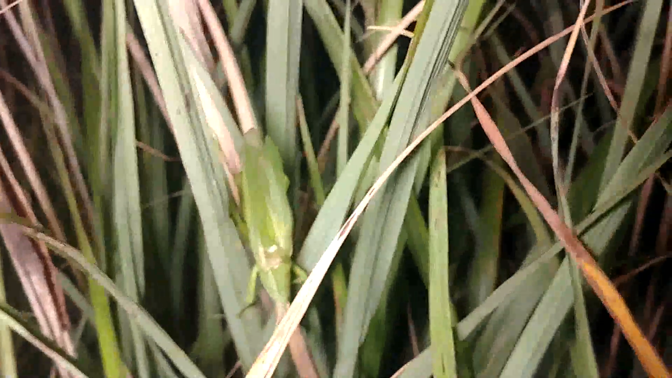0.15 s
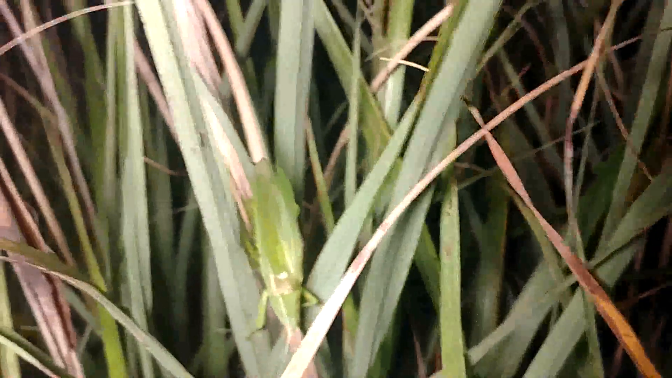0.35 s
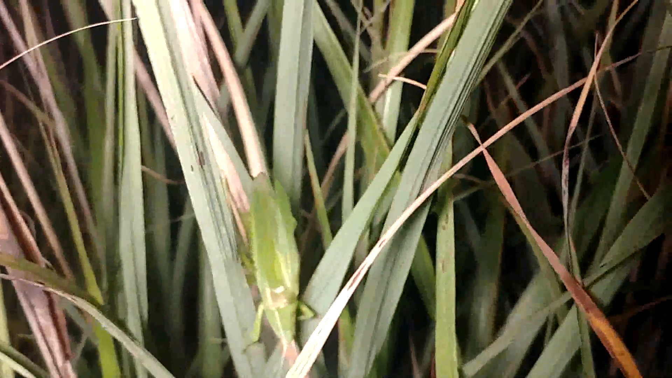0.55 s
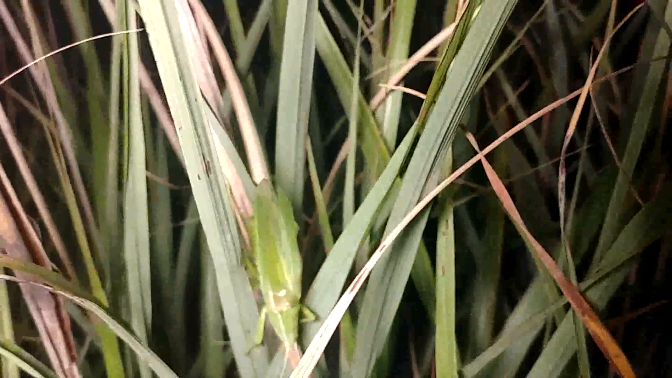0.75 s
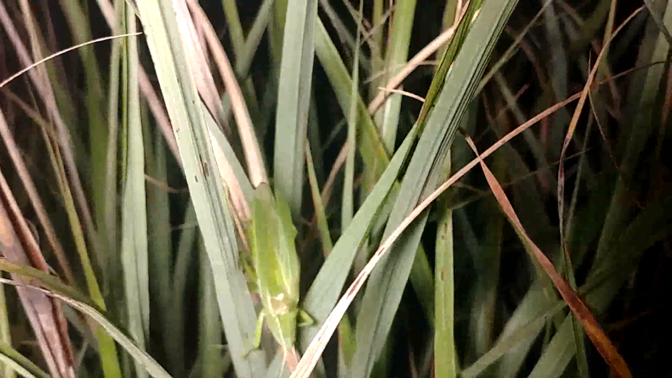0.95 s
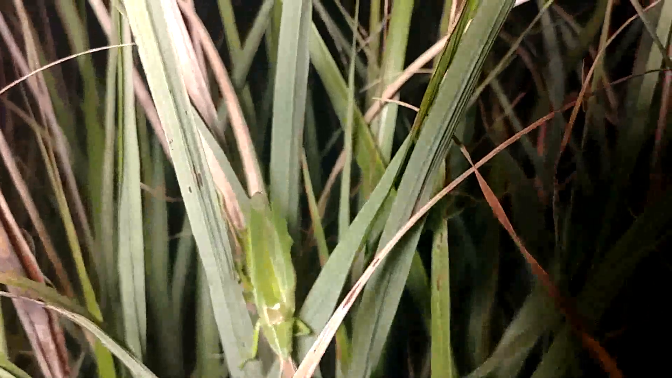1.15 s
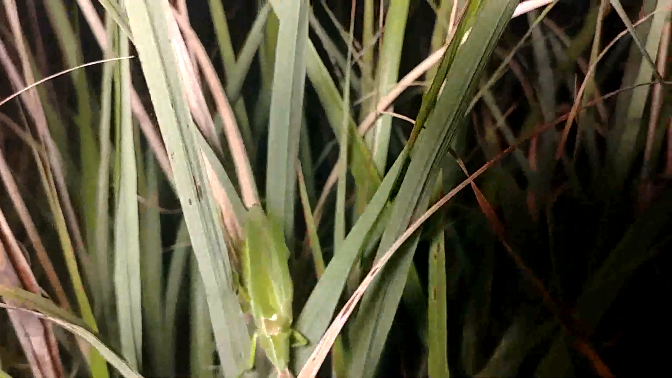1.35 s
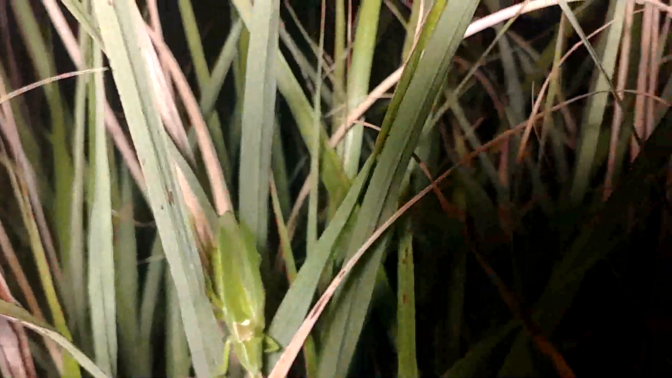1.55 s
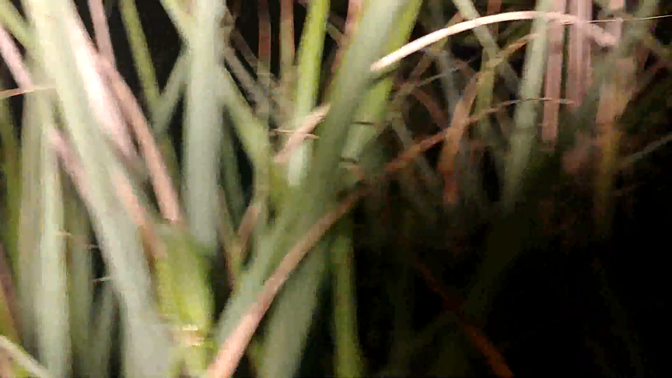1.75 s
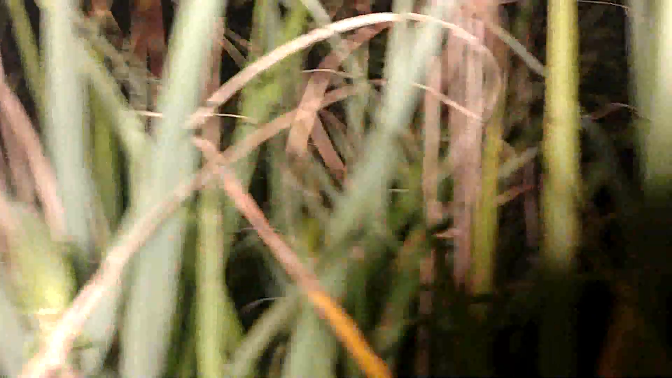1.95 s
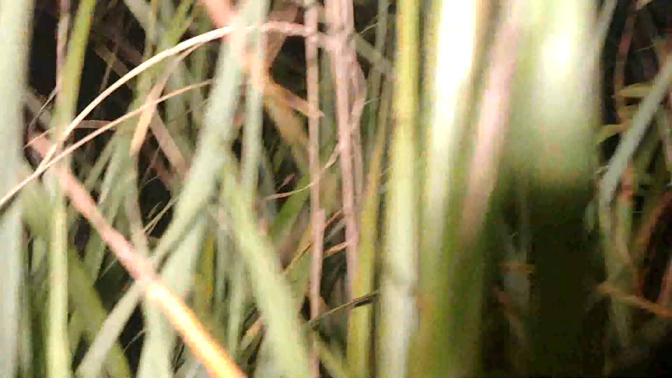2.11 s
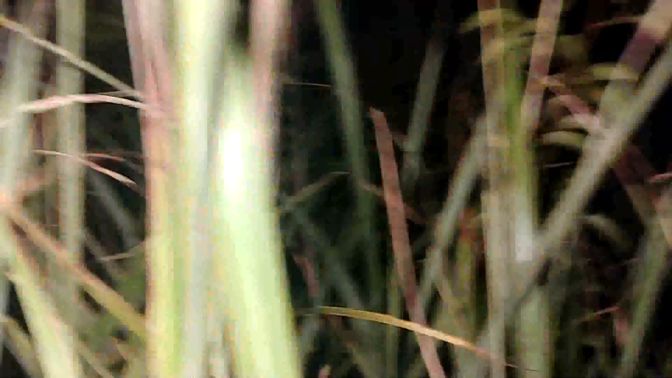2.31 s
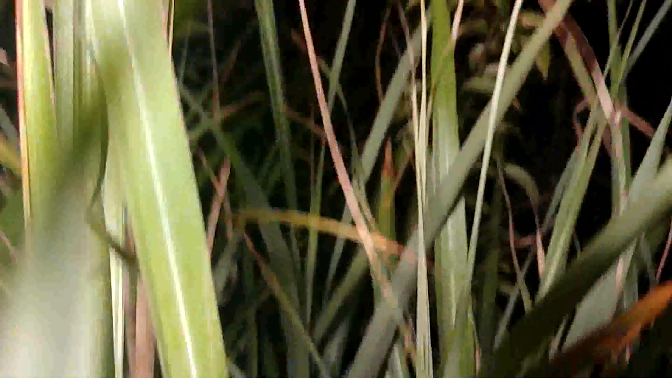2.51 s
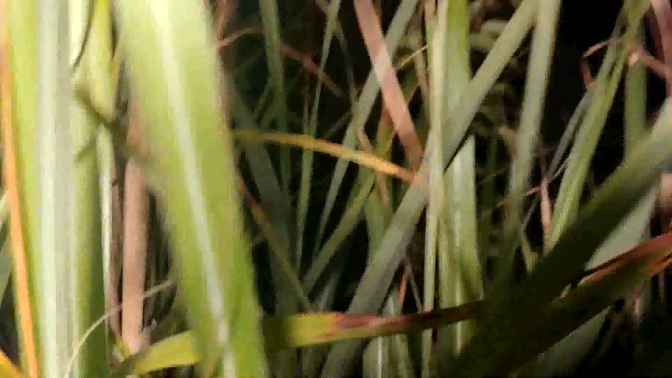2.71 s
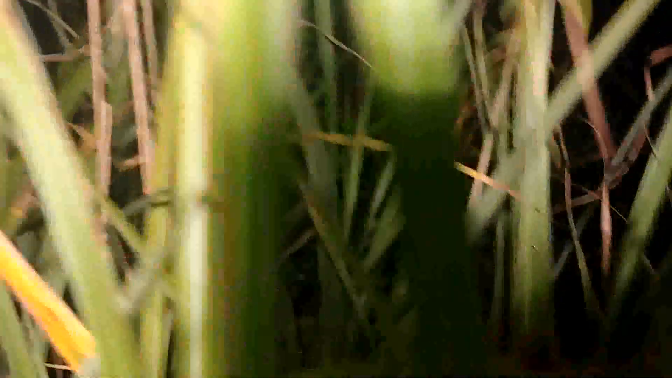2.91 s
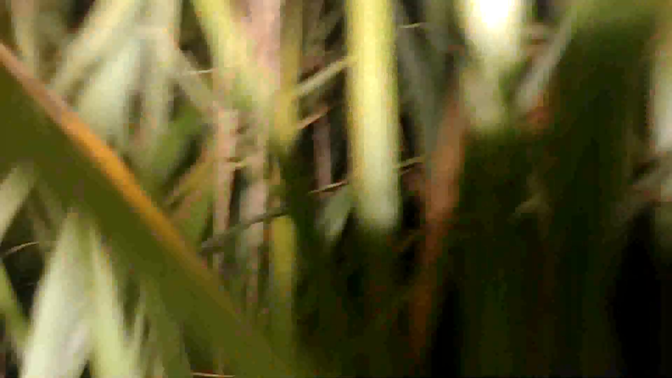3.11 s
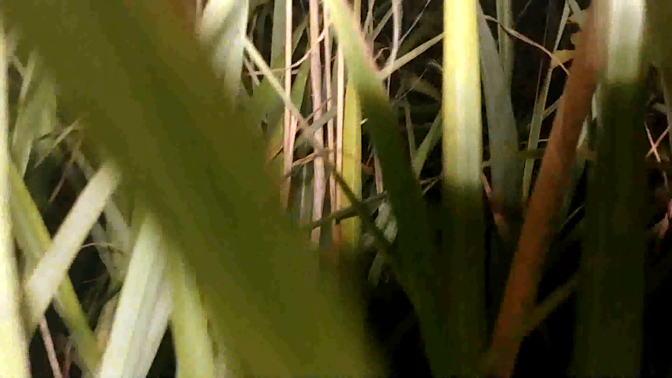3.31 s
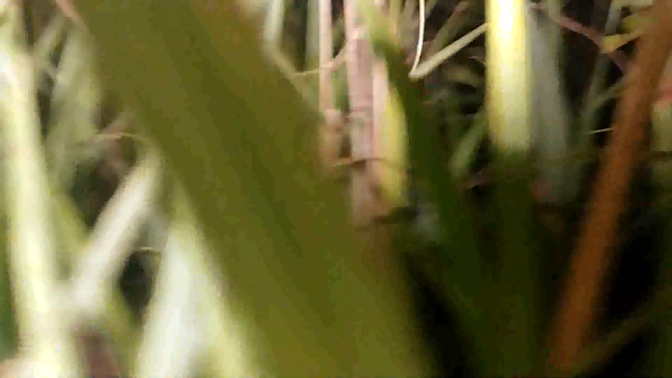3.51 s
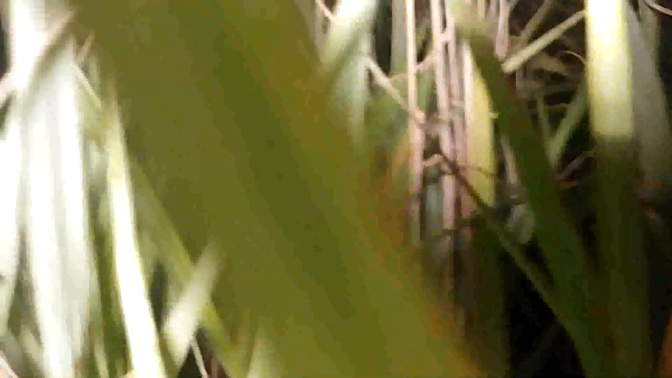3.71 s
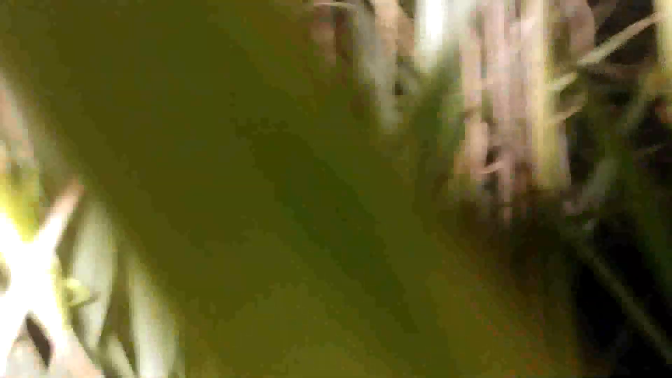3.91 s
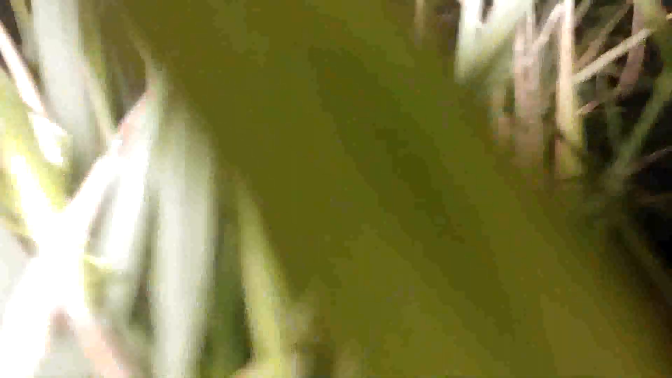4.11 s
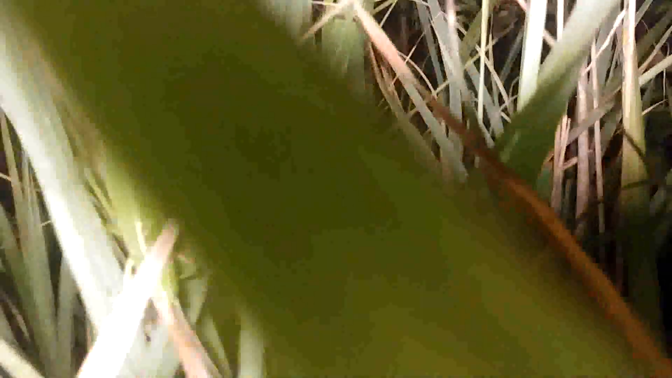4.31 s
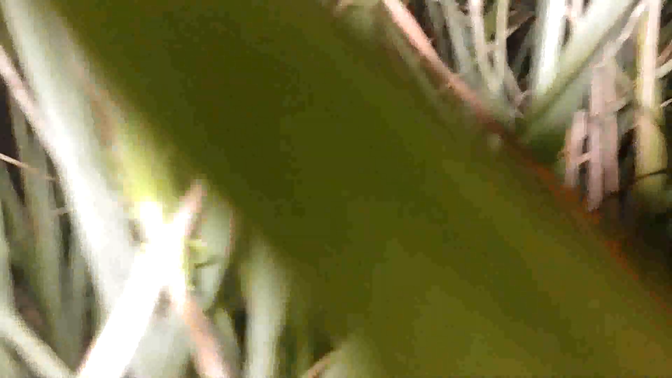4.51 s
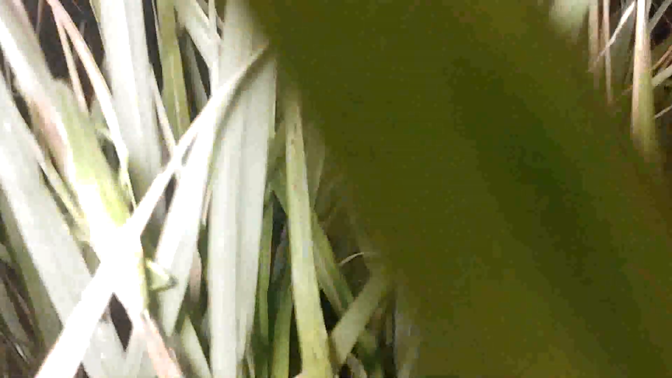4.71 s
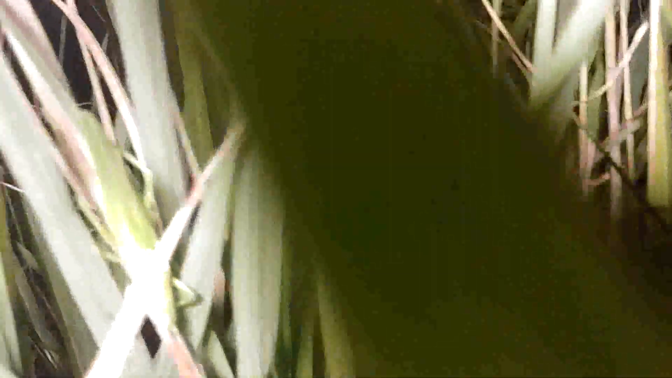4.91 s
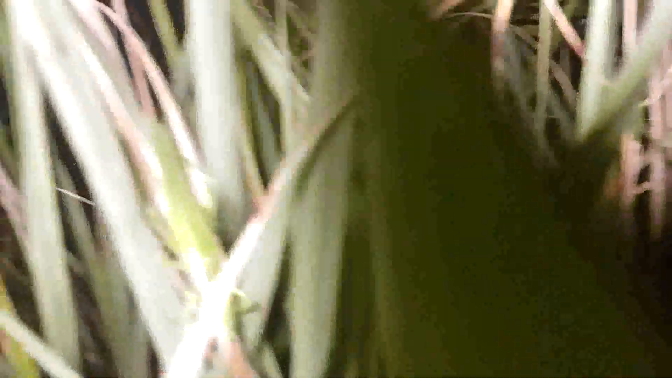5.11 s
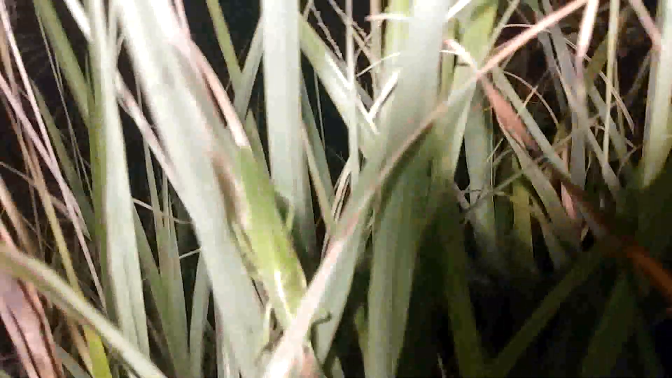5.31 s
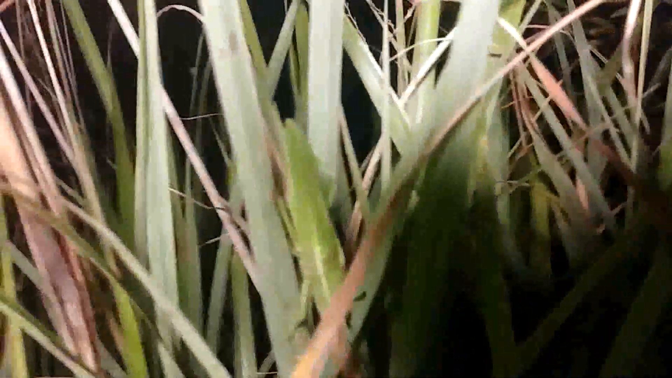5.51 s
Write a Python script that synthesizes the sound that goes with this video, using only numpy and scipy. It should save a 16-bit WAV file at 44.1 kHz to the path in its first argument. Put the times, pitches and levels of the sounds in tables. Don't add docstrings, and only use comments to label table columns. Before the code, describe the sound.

Outdoors at night in tall grass, a large katydid sings a hand's width from a handheld stereo microphone. From 0 to 3.27 s its shrill, rasping buzz, about 168 wing strokes a second, dominates: bright ringing around 8 to 10 kHz, hissy scraping above, and a low hum with gritty overload. Stereo colour and hum shift as the microphone swings past, especially around 2 s. Near 2.3 s there is a dull bump and the stroke rate dips, then recovers; at 3.2 s it slows sharply and stops with a soft thump. The background then opens up: a blurred drone of far katydids, a small insect chirping about ten times a second, faint lower cricket trills, and quiet rumbling air with a thin hiss. At 3.62 s two very sharp snaps, almost fused, tick toward the left. Small knocks, creaks and soft grass rustles continue from 3.9 s to 5.5 s.

```python
import sys
import numpy as np
from scipy import signal
from scipy.fft import rfft, irfft, next_fast_len
from scipy.io import wavfile
from scipy.ndimage import uniform_filter1d

SR = 44100
rng = np.random.default_rng(int(sys.argv[2]) if len(sys.argv) > 2 else 0)


def master_out(mix):
    frames = np.transpose(np.atleast_2d(mix))
    ceiling = np.clip(frames, -1, 1)
    pcm = np.round(ceiling * 32767).astype(np.int16)
    wavfile.write(sys.argv[1], SR, pcm)


def volts_from_db(level):
    exponent = np.asarray(level, float) / 20
    return 10 ** exponent


N = 244755
TIME = np.arange(N) / SR
STOP_S = 3.274
# frequency_hz, density_db_per_hz
SCRAPE_SPECTRUM = [(5000, -38), (7000, -5.5), (10500, -5), (12000, -7), (13500, 0.5), (15000, 3.5),
                   (16500, 4)]


def evened(x):
    return x / np.sqrt(np.mean(x ** 2) + 1e-20)


def curves(rows, t=TIME):
    s, *columns = np.transpose(rows)
    return [np.interp(t, s, c) for c in columns]


def colour(x, points):
    size = next_fast_len(N)
    hz, db = np.transpose(points)
    bins_hz = np.fft.rfftfreq(size, 1 / SR)
    gain = volts_from_db(np.interp(np.log(bins_hz + 1), np.log(hz + 1), db))
    return irfft(rfft(x, size) * gain, size)[..., :N]


def wobble(span):
    bell = np.exp(-np.linspace(-3, 3, 301) ** 2 * (50 / span) ** 2)
    return evened(signal.oaconvolve(rng.standard_normal(N), bell, "same"))


def resonate(x, hz, width):
    turn = np.exp(2j * np.pi * np.cumsum(hz * np.ones(N)) / SR)
    r = np.exp(-np.pi * width / SR)
    return 2 * (turn * signal.lfilter([1 - r], [1, -r], x / turn)).real


def resonate_twice(x, hz, width):
    return resonate(resonate(x, hz, width), hz, width)


def panned(x, db):
    return x * np.array([volts_from_db(db / 2), volts_from_db(-db / 2)]).reshape(2, -1)


def katydid():
    # time_s, strokes_per_s
    beat = [
        (0, 168.49),
        (2.21, 168.66),
        (2.34, 155.57),
        (2.45, 163.88),
        (3.05, 166.99),
        (3.21, 163.31),
        (3.235, 133.38),
        (3.274, 127.87),
    ]
    # time_s, right_path_mm (extra), hiss_path_mm (more for the hiss), aim_db, overload_db
    swing = [(0, 24.4, 3, 2.5, -1), (.23, 25.7, 0, 0.5, -2), (.38, 25, -2.5, 1, -1),
             (.8, 18, 4.5, 0.5, -0.5), (1.2, 17.9, 7, -0.5, 1), (1.45, 16.1, 5.5, -1, 2),
             (1.75, 17.4, 6.5, -1.5, -3), (2.03, 53.8, 3, -0.5, 1), (2.15, 62.5, 7, 0.5, 1.5),
             (2.33, 70, 8, 0.5, -20), (2.52, 103.3, 5.5, 1.5, 0), (2.78, 117.5, -3.5, 1, -0.5),
             (3.05, 115, -0.5, 1, 1.5), (3.2, 101, 1, 3.5, 0), (3.3, 91, 1, -1, 2.5)]
    # ahead_db, beside_db
    pan_ends = (0.1, 2)
    # ahead_db, beside_db
    echo_ends = [(-16.5, -16), (-13.5, -7.5)]
    # frequency_hz, density_db_per_hz
    fuzz_spectrum = [(18, -43), (30, -7.5), (281, -11.5), (329, -11.5), (414, -11.5), (1010, -11),
                     (4140, -9.5), (6250, -4.5), (7000, 0.5), (9100, 7), (15400, -120)]
    first_stroke, song_db, song_per_aim, fuzz_db = .1, -11.5, 0.21, -29
    ahead_mm, aside_mm = 25, 100
    sound_mm_per_s = 343000

    on = TIME < STOP_S
    strokes = first_stroke + np.cumsum(curves(beat)[0] * on) / SR
    singing = uniform_filter1d(1. * on, size=60)
    ring, scrape, pressure = wings(strokes, slip=.019, rough_db=1.3, vary_db=.45)

    path_mm, hiss_mm, aim_db, overload_db = curves(swing)
    scrape_db = -18.5 + aim_db
    pan_db, *echo_db = (np.interp(path_mm, (ahead_mm, aside_mm), ends) for ends in (pan_ends, *echo_ends))
    sound = singing * (volts_from_db(song_db + song_per_aim * aim_db) * ring + volts_from_db(scrape_db) * scrape)
    lags = np.array([path_mm, hiss_mm]) / sound_mm_per_s * SR
    song = panned(ports(sound, *lags, *echo_db), pan_db)

    scattered = .46 * volts_from_db(scrape_db) * evened(colour(rng.standard_normal((2, N)), SCRAPE_SPECTRUM))
    fuzz = evened(colour(rng.standard_normal((2, N)) * (.5 + pressure), fuzz_spectrum))
    overload = volts_from_db(overload_db) * hum(strokes, song, path_mm)
    return song + singing * (overload + scattered + volts_from_db(fuzz_db) * fuzz)


def wings(strokes, slip=.03, rough_db=2.2, vary_db=.7):
    # frequency_hz, width_hz, level_db
    wing_modes = [(8030, 1560, 0), (9353, 1120, 4)]
    # frequency_hz, level_db
    radiation = [(6300, -16), (7000, -4.5), (7600, 2), (9800, 0.5), (10300, -1), (10900, 10)]
    # share_of_cycle, tooth_hz
    tooth_rate = [
        (-.25, 8450),
        (-.12, 9350),
        (-.04, 9600),
        (.09, 8280),
        (.28, 8020),
        (.75, 8400),
    ]
    # middle_cycles, half_hold_cycles, level_db, slope_db_per_cycle
    press = [
        (-.06, .05, -3.5, 85),
        (.125, .115, 0, 160),
        (.68, .07, -11, 40),
    ]
    # middle_cycles, half_hold_cycles, level_db, slope_db_per_cycle
    rasp = [
        (-.09, .03, 0, 80),
        (.17, .03, -3, 70),
        (.64, .04, 1.5, 70),
    ]

    cycle = (strokes + .25) % 1 - .25
    tooth_hz, = curves(tooth_rate, cycle)
    press_db = pushes(cycle, press, rest_db=-18)
    scrape_db = pushes(cycle, rasp, rest_db=-10)
    rate_chance, force_chance = rng.standard_normal((1200, 2))[(strokes + .25).astype(int)].T
    tooth_hz = tooth_hz * (1 + 0.005 * rate_chance + slip * wobble(span=7.0))
    force_db = press_db + vary_db * force_chance + rough_db * wobble(span=16.0)
    teeth = np.cos(2 * np.pi * np.cumsum(tooth_hz) / SR) * volts_from_db(force_db)
    ring = sum(volts_from_db(db) * resonate_twice(teeth, hz, width * 1.7) for hz, width, db in wing_modes)
    scrape = colour(rng.standard_normal(N) * volts_from_db(scrape_db + 3.5 * wobble(span=6.3)), SCRAPE_SPECTRUM)
    return evened(colour(ring, radiation)), evened(scrape), volts_from_db(press_db)


def pushes(cycle, rows, rest_db):
    levels = []
    for mid, hold, db, slope in rows:
        outside = np.maximum(abs(cycle - mid) - hold, 0)
        levels.append(np.maximum(db - slope * outside, rest_db))
    return np.max(levels, axis=0)


def ports(x, lag, hiss_lag, *echo_db):
    # delay_s, level_db
    blades = [
        [(.00098, -0.5), (.00147, -15.5), (.0022, -17)],
        [(.0007, -6), (.0017, 4), (.0026, -1.5)],
    ]
    hiss_from_hz = 10400
    hz, t, z = signal.stft(x, SR, nperseg=256)
    hz = hz[:, None]
    delay = np.interp(t, TIME, lag) + (hz > hiss_from_hz) * np.interp(t, TIME, hiss_lag)
    turn = -2j * np.pi * hz * delay / SR
    direct, mirrored, other = (
        signal.istft(z * np.exp(share * turn), SR, nperseg=256)[1][:N] for share in (1, .6, .15))
    taps = [sum(volts_from_db(db) * np.sinc(np.arange(200) - s * SR) for s, db in echoes) for echoes in blades]
    echoes = signal.oaconvolve([other, -mirrored], taps, axes=1)[:, :N]
    return np.array([x, -direct]) + volts_from_db(np.array(echo_db)) * echoes


def hum(strokes, song, path_mm):
    overtones = [(0, -2.5, -2.5, 0.5, 2, -1.5, 1.5, -4.5, -5, -11, -25.5),
                 (0, -11.5, -5, -13.5, -6.5, -9.5, -8, -13, -13, -20.5, -12)]
    snap = [(1.95, 1.9, 1.25), (-.9, 5.2, 1.45)]
    # fundamental_ahead_db, fundamental_beside_db, overtones_ahead_db, overtones_beside_db
    hum_levels = [(-46.5, -37.5, -68, -45), (-54, -52, -42.5, -59)]
    # frequency_hz, density_db_per_hz
    rough_spectrum = [(71, -44), (120, -43), (180, 11), (489, -11), (1030, 14), (1530, 6), (1990, -13),
                      (5000, -12), (6500, -42), (11000, -120)]
    path_ends_mm = (25, 59)
    waver_db, waver_per_s = 2, 9
    out = []
    for port, (low, high, lag) in enumerate(snap):
        ends_db = np.reshape(hum_levels[port], (2, 2))
        low_db, high_db = (np.interp(path_mm, path_ends_mm, ends) for ends in ends_db)
        low_db = low_db + waver_db * np.interp(TIME * waver_per_s, np.arange(64), rng.standard_normal(64))
        turn = 2 * np.pi * strokes + 0.013 * wobble(span=36.0)
        lines = sum(volts_from_db(db) * np.cos(k * (turn - lag) + high) for k, db in enumerate(overtones[port], start=2))
        rough = evened(colour(song[port] ** 2, rough_spectrum))
        fundamental = volts_from_db(low_db) * np.cos(turn + low)
        out.append(np.sqrt(2) * (fundamental + volts_from_db(high_db) * (lines + 0.28 * rough)))
    return np.array(out)


def flicks():
    # start_s, level_db
    snap_times = [
        (3.6153, 3),
        (3.6168, 3),
    ]
    snaps = sum(volts_from_db(db) * np.sinc(np.arange(N) - s * SR) for s, db in snap_times)
    low_ring = 6.6 * resonate(resonate(snaps, 8320, 550), 8650, 1400)
    high_ring = 1.4 * resonate(resonate(snaps, 11600, 1500), 14000, 2250)
    click = 0.13 * colour(snaps, [(300, -36), (1000, -1), (5000, 4.5), (8000, -30)])
    sound = low_ring + high_ring + click
    return panned(np.array([sound, np.roll(sound, 6)]), 15.4)


def bumps():
    # start_s, peak_db, pitch_hz, t60_s, left_right_db
    knocks = [(2.29, -22, 80, .14, 4), (3.277, -22, 72, 0.074, 22), (3.931, -35.5, 987, 0.076, 17),
              (4.168, -34, 297, 0.018, -20), (4.178, -35, 171, 0.03, -12), (4.168, -38.5, 73, 0.22, 7),
              (4.91, -47, 680, 0.045, -8), (5.027, -30.5, 79, 0.13, 18), (5.235, -47, 1086, 0.084, 18),
              (5.24, -46, 2190, 0.054, 13), (5.26, -41, 1014, 0.063, -15), (5.355, -37, 90, 0.11, 35),
              (5.359, -25.5, 151, 0.019, 6), (5.398, -31.5, 74, 0.14, 20)]
    rise_share = 0.24
    out = np.zeros((2, N + SR))
    t = np.arange(SR // 4) / SR
    for s, db, hz, t60, pan_db in knocks:
        decay = volts_from_db(db - 60 * t / t60)
        swell = 1 - np.exp(-t / (rise_share * t60))
        first = round(s * SR)
        out[:, first:first + len(t)] += panned(decay * swell * np.sin(2 * np.pi * hz * t), pan_db)
    return out[:, :N]


def rustles():
    # start_s, level_db, t60_s
    brushes = [(3.277, -51.5, 0.38), (3.67, -54.5, .06), (3.93, -58, 1), (4.169, -50, 0.25),
               (4.31, -56.5, 0.18), (4.6, -63, .2), (4.71, -60, 0.064), (4.92, -60, .1),
               (5.22, -59.5, 0.32)]
    # frequency_hz, density_db_per_hz
    friction = [(150, -11), (400, 5), (1500, -8.5), (3500, -2), (5000, -30)]
    swell = sum(volts_from_db(db - 60 * np.maximum(TIME - s, 0) / t60) * (TIME > s) for s, db, t60 in brushes)
    return swell * evened(colour(rng.standard_normal((2, N)), friction))


def chirper():
    # start_s, peak_db, length_s
    chirp_times = [(3.285, -35, .095), (3.385, -36, .065), (3.475, -34, .055), (3.572, -36, .05),
                   (3.663, -36, .06), (3.742, -40, .05), (3.812, -41, .07), (3.916, -37, .06),
                   (3.985, -39, .075), (4.065, -35, .068), (4.178, -36, .075), (4.305, -38, .075),
                   (4.425, -36, .075), (4.53, -37, .1), (4.655, -35, .075), (4.737, -38, .04),
                   (4.795, -37, .068), (4.884, -38, .065), (4.975, -38, .055), (5.07, -38, .065),
                   (5.15, -38, .05), (5.225, -39, .05), (5.32, -40, .04), (5.385, -39, .065),
                   (5.472, -36, .07)]
    chirp_hz, sag_hz_per_s, spread_hz = 6110, 7300, 130
    peak_to_mean_db = 10
    s, db, length = np.transpose(chirp_times)
    k = np.clip(np.searchsorted(s, TIME) - 1, 0, None)
    swell = np.sin(np.pi * np.clip((TIME - s[k]) / length[k], 0, 1)) ** .8
    hz = chirp_hz - sag_hz_per_s * length[k] + spread_hz * rng.standard_normal(len(s))[k]
    pulses = trill(hz, width=600, rate=95, duty=.5, same=.25, glide=.085)
    return volts_from_db(db[k] - peak_to_mean_db) * swell * pulses


def cricket():
    # start_s, length_s, level_db
    trill_times = [(3.26, 0.066, -52), (3.534, 0.4, -62), (4.01, 0.21, -63), (4.363, 0.385, -65),
                   (4.956, .24, -62)]
    rise_s, fall_s = 0.025, 0.034
    gate = 0
    for s, length, db in trill_times:
        ramp = np.minimum((TIME - s) / rise_s, (s + length - TIME) / fall_s)
        gate = gate + volts_from_db(db) * np.clip(ramp, 0, 1)
    return gate * trill(3420, width=480, rate=64, duty=-.15, same=1.1, glide=.015)


def trill(hz, width, rate, duty, same, glide):
    turn = 2 * np.pi * np.cumsum(rate * (1 + 0.0283 * wobble(span=63.0))) / SR
    hz = hz * (1 + glide * np.cos(turn) + 0.01225 * wobble(span=28.2))
    tone = same * np.cos(2 * np.pi * np.cumsum(hz) / SR)
    drive = (tone + rng.standard_normal((2, N))) * np.maximum(np.sin(turn) + duty, 0)
    return evened(np.array([resonate_twice(v, hz, width) for v in drive]))


def chorus():
    # time_s, level_db
    chorus_level = [(3.3, -27.5), (3.78, -30.5), (4.32, -30.5), (4.46, -31.5), (5.55, -30.5)]
    # frequency_hz, level_db
    distance = [(6000, -8), (7000, 6.5), (7600, 4.5), (8400, -0.5), (9000, -4), (9600, -12), (10300, -10.5)]
    level_db, = curves(chorus_level)
    out = np.zeros((2, N))
    for rate, db, pan_db in [(166.5, 0, 8), (161, -2, 6), (172, -3, 4), (164, -7, -3)]:
        strokes = TIME * rate + rng.random() + 0.054 * wobble(span=56.0)
        tail = rng.standard_normal((2, 1500)) * volts_from_db(-60 * np.arange(1500) / SR / 0.023)
        tail[:, 0] = 1.5
        ring = wings(abs(strokes))[0]
        blurred = signal.oaconvolve(ring[None], tail, axes=1)[:, :N]
        out += panned(volts_from_db(db) * blurred, pan_db)
    return volts_from_db(level_db + 2.5) * evened(colour(out, distance))


def night():
    # frequency_hz, density_db_per_hz
    air_spectrum = [(15, -45), (25, -17), (76, 12.5), (165, -4.5), (503, -8), (1500, -17.5), (2880, -19),
                    (3230, -8), (4380, -12), (5270, -6), (6500, -10.5), (8450, -55), (14300, -120)]
    # frequency_hz, density_db_per_hz
    hiss_spectrum = [(6760, -51), (11500, -16), (14200, 0), (15000, 1), (15800, -11)]
    a, b = rng.standard_normal((2, N))
    mixed = np.array([a + 1.16 * b, a - 0.86 * b])
    air = volts_from_db(-56.5) * evened(colour(mixed * volts_from_db(1.4 * wobble(span=140.0)), air_spectrum))
    hiss_db = -64.5 + 4.0 + 18.0 * np.exp(-abs(TIME - STOP_S) / 0.2)
    return air + volts_from_db(hiss_db) * evened(colour(rng.standard_normal((2, N)), hiss_spectrum))


def scene():
    # frequency_hz, level_db
    quiet_band = [(10300, 0), (10450, -70), (12900, -70), (13100, 0)]
    duck_db = -12
    behind = colour(chorus() + chirper() + cricket() + night(), quiet_band) + bumps() + rustles()
    return katydid() + flicks() + behind * volts_from_db(duck_db * (TIME < STOP_S))


def top_cut(x):
    return signal.sosfilt(signal.butter(12, 15910, fs=SR, output="sos"), x)


def record(dry):
    flattened = np.clip(dry, -.96, .96)
    low_pass = signal.firwin(401, 15840, window=("kaiser", 7), fs=SR)
    limited = signal.oaconvolve(flattened, low_pass[None], "same")
    return top_cut(limited)


dry = scene()
out = record(dry)
master_out(out)
```